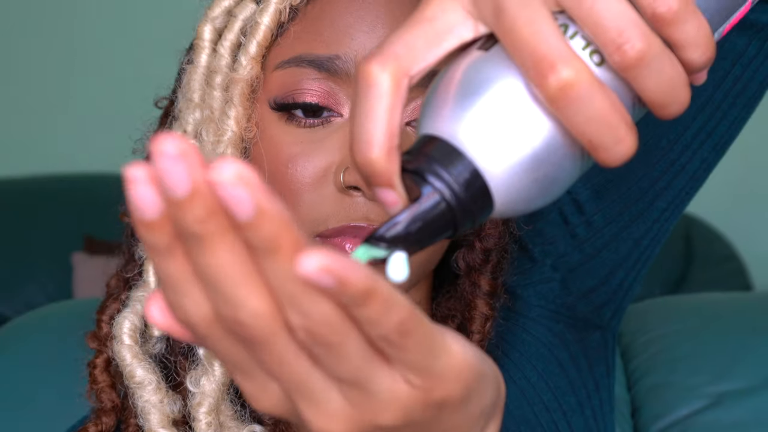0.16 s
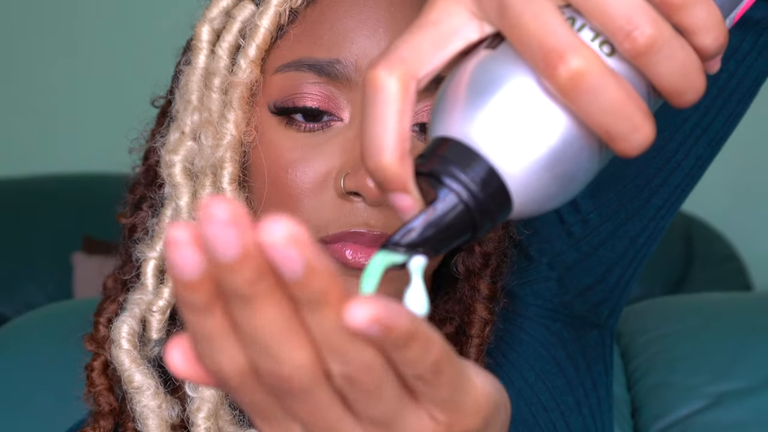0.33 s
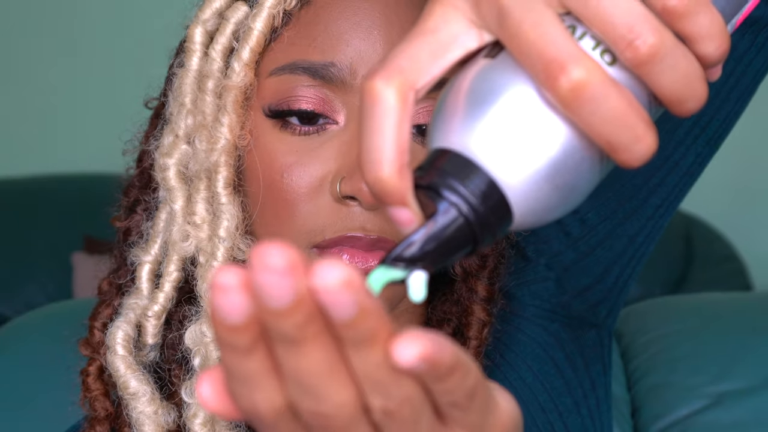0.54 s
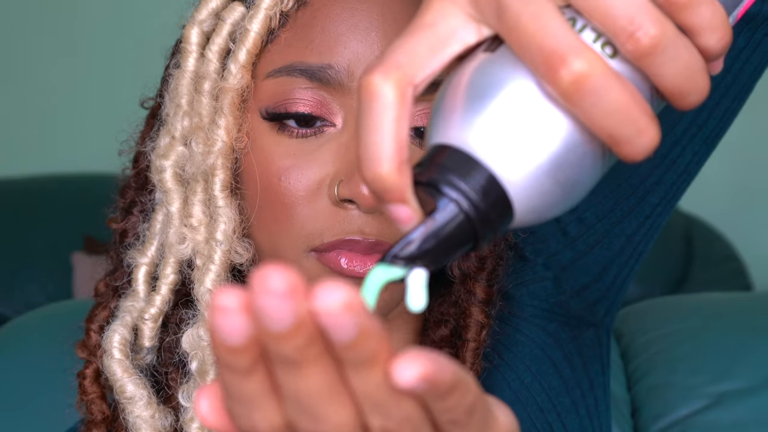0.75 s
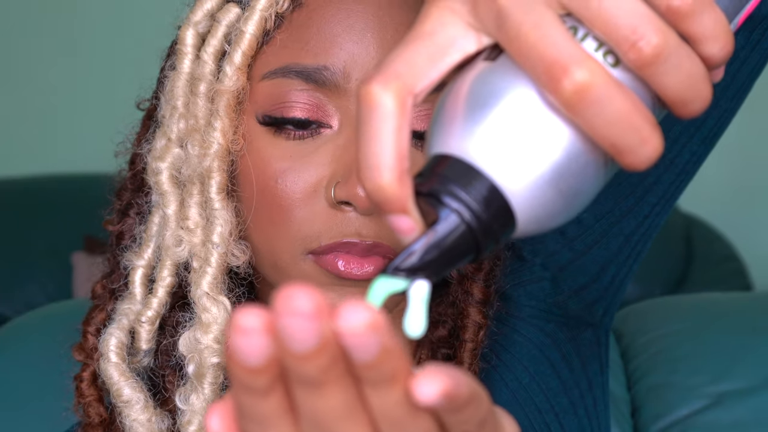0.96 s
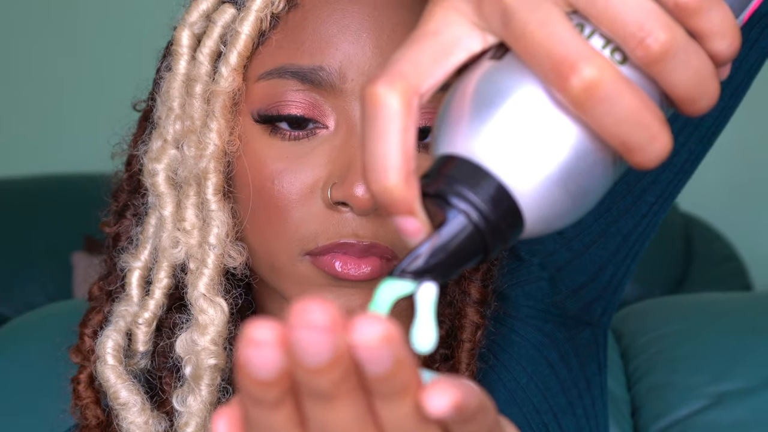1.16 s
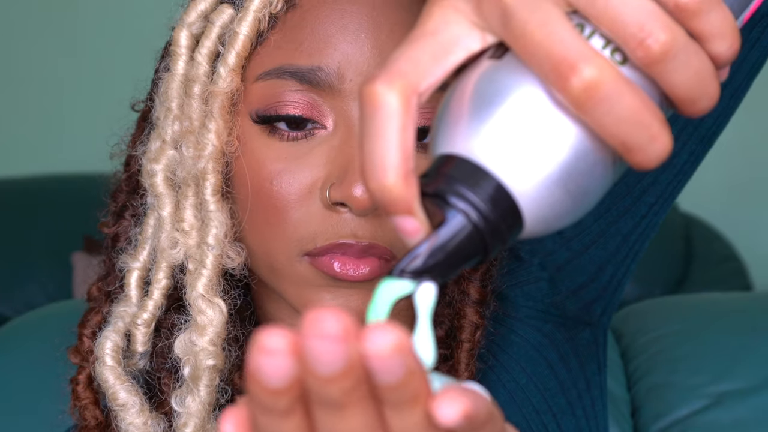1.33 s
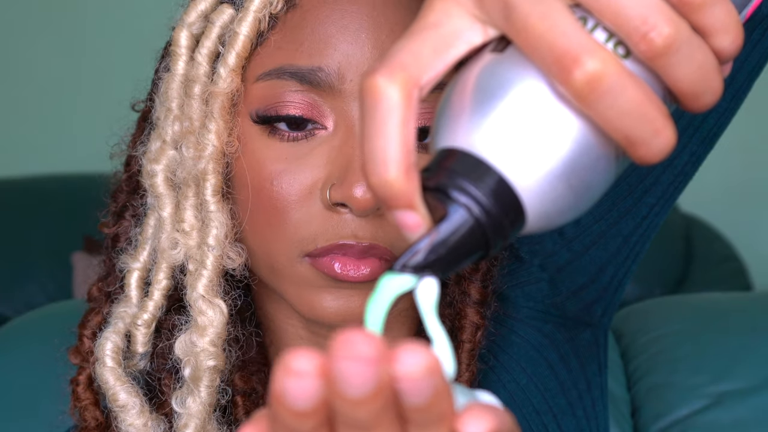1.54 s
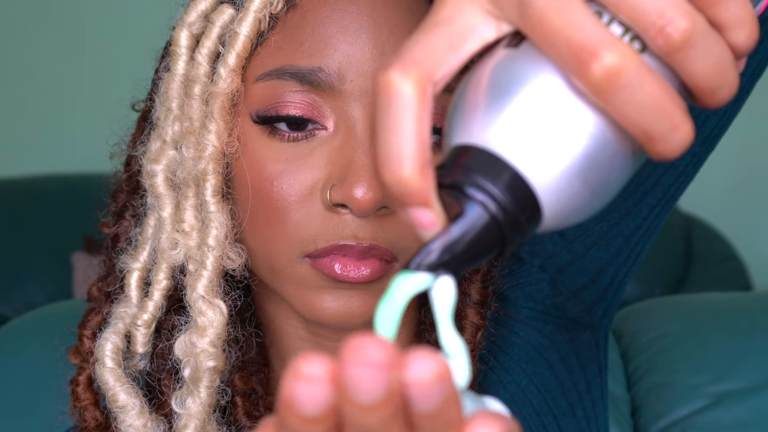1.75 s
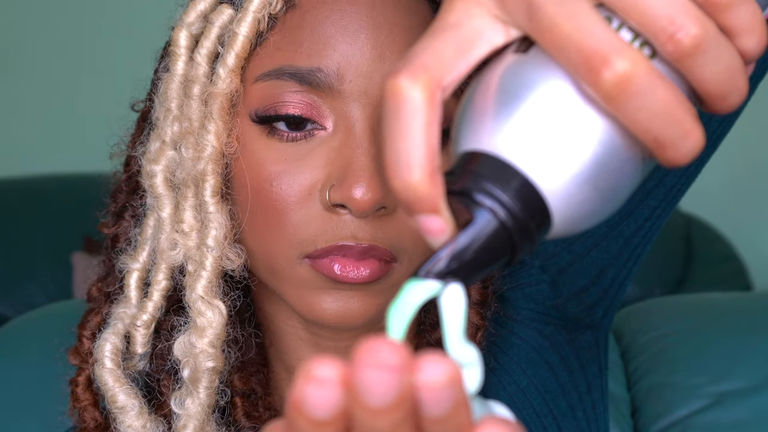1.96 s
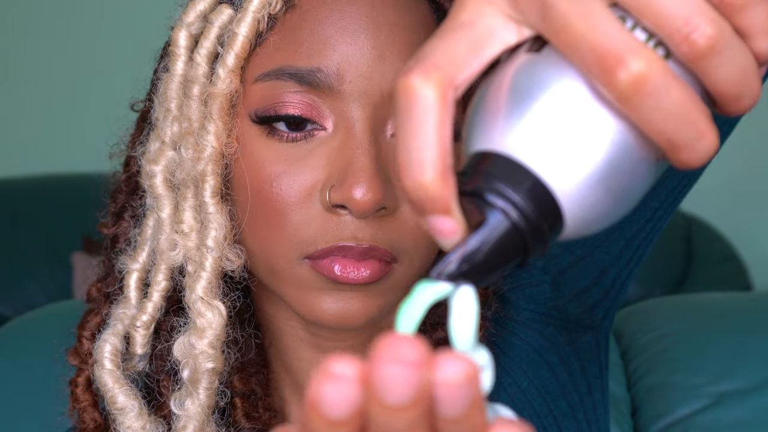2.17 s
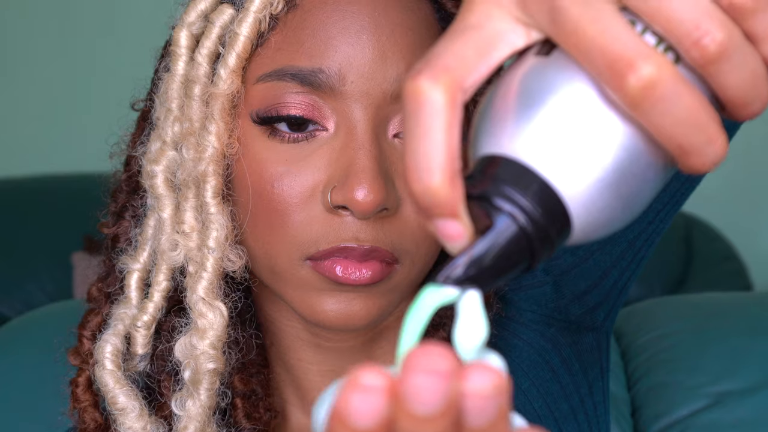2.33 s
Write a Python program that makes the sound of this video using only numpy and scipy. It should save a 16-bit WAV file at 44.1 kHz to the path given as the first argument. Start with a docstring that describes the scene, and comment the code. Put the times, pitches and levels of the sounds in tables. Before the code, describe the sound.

Foam hisses from a mousse can, already running at the start and very close. A nozzle tick lands at 0.1 s; the bright, gassy fizz soon settles, then grows duller and uneven from about 1 s, with tiny whistles near 1.3 and 1.5 s. Around 1.7 s it breaks into wet, crackling sputter, with spits and bubbly pops until 2.5 s. Faint knocks, low rumble, small dry room.

```python
"""In a small furnished room, an upturned can of hair mousse is sprayed into a palm close to the microphone.
Foam fizzes through the nozzle: coloured clicks and noise with narrow, wavering spout resonances.
The flow then breaks into a lower, crackling sputter of noise puffs, ringing bubbles, pops and sharp spits.
Short noise bursts make the nozzle's ticks, a pat of foam and the knocks and thuds of handling.
A low, booming rumble and the steady air of the room are filtered noise."""
import sys
import numpy as np
from scipy import signal
from scipy.fft import rfft, irfft, next_fast_len
from scipy.io import wavfile

SR = 44100
rng = np.random.default_rng(int(sys.argv[2]) if len(sys.argv) > 2 else 0)


def digitize_waveform(pressure):
    """Quantize a signal to 16-bit integers and store it at the path in sys.argv[1].

    Rows of a 2-D input are taken as channels; values are limited to [-1, 1].
    """
    field = np.atleast_2d(pressure).T
    bounded = np.clip(field, -1, 1)
    quanta = np.round(bounded * 32767).astype(np.int16)
    wavfile.write(sys.argv[1], SR, quanta)


N = 110205
TIME_S = np.arange(N) / SR


def undb(db):
    """Logarithmic level: decibels become an amplitude gain."""
    return np.exp(np.asarray(db) * (np.log(10) / 20))


def unit(x):
    """Normalisation: the signal is scaled to rms 1."""
    return x / np.sqrt(np.mean(x ** 2) + 1e-18)


def curve(rows):
    """Envelope: gain over time from rows of (time [s], level [dB]), straight in dB."""
    return undb(np.interp(TIME_S, *np.array(rows).T))


def ramp(start_s, end_s):
    """Crossfade weight: a straight rise from 0 to 1."""
    return np.clip((TIME_S - start_s) / (end_s - start_s), 0, 1)


def colour(x, points):
    """Minimum-phase filtering: a causal response through points of (frequency [Hz], gain [dB])."""
    size = 8192
    hz, db = np.array(points, float).T
    f = np.maximum(np.fft.rfftfreq(size, 1 / SR), 1)
    log_gain = np.log(undb(np.interp(np.log(f), np.log(hz), db)))
    # folding the cepstrum onto positive times makes the response causal
    cepstrum = irfft(log_gain)
    cepstrum[1:size // 2] *= 2
    cepstrum[size // 2 + 1:] = 0
    response = irfft(np.exp(rfft(cepstrum)))[:size // 2]
    length = x.shape[-1]
    padded = next_fast_len(length + size // 2, True)
    return irfft(rfft(x, padded) * rfft(response, padded), padded)[..., :length]


def walk(rate_hz):
    """Random modulation: band-limited wavering, mostly slower than the rate, with rms 1."""
    size, hop = 4096, 32
    f = np.fft.rfftfreq(size, hop / SR) / rate_hz
    spectrum = rfft(rng.standard_normal(size)) * np.sqrt(f) * np.exp(-f ** 2)
    return np.interp(np.arange(N) / hop, np.arange(size), unit(irfft(spectrum)))


def clicks(per_s, spread_db):
    """Shot noise: impulses at random times, of uneven size and random sign."""
    hit = rng.random(N) < per_s / SR
    size = undb(spread_db * np.minimum(rng.exponential(size=N), 4))
    return unit(hit * size * rng.choice([-1, 1], N))


def ring(x, decay_s):
    """Exponential decay: every impulse leaves a tail."""
    return signal.lfilter([1], [1, -np.exp(-1 / (decay_s * SR))], x)


def resonance(hz, width_hz):
    """Noise-driven resonance: slow random envelopes carry a tone whose pitch may move."""
    decay_s = 1 / (np.pi * width_hz * 1.5)  # two decays in a row narrow the band
    in_phase, quadrature = ring(ring(rng.standard_normal((2, N)), decay_s), decay_s)
    phase = 2 * np.pi * np.cumsum(hz * np.ones(N)) / SR
    return unit(in_phase * np.cos(phase) + quadrature * np.sin(phase))


def flicker(x, rate_hz, depth_db):
    """Independent band modulation: each third of an octave wavers on its own."""
    size = next_fast_len(N, True)
    octave = np.log2(np.maximum(np.fft.rfftfreq(size, 1 / SR), 1))
    centres = np.arange(10.67, 13.9, 1 / 3)  # octaves above 1 Hz
    spectrum = rfft(x, size)
    out = np.zeros(N)
    for one_band in np.eye(len(centres)):
        band = irfft(spectrum * np.interp(octave, centres, one_band), size)[:N]
        out = out + band * undb(depth_db * walk(rate_hz))
    return out


def blows(rows, points, decay_s, crack):
    """Impact: each row gives a click and a decaying puff of noise; its level is the rms over the decay time."""
    out, t = np.zeros(N + SR), np.arange(SR // 5) / SR
    for s, db in rows:
        x = rng.standard_normal(len(t)) * np.exp(-t / decay_s)
        x[0] += crack
        x = colour(x, points)
        start = int(s * SR)
        out[start:start + len(t)] += x * undb(db) * np.sqrt(decay_s * SR) / np.linalg.norm(x)
    return out[:N]


def place(x, pan):
    """Interchannel level difference: left minus right from points of (frequency [Hz], difference [dB])."""
    left, right = x * np.ones((2, 1))
    return np.array([colour(left, [(hz, db / 2) for hz, db in pan]),
                     colour(right, [(hz, -db / 2) for hz, db in pan])])


# spectrum of the air: (frequency [Hz], relative level per Hz [dB])
AIR_COLOUR = [(20, -44), (100, -17), (300, -3), (550, -2.5), (900, -16.5), (4000, -28)]
# stereo width of the air: (frequency [Hz], side against mid [dB])
AIR_SIDE = [(60, -11), (150, -10), (400, -4)]


def air():
    """Mid-side stereo: steady noise whose two channels are partly related."""
    mid, side = rng.standard_normal((2, N))
    side = colour(side, AIR_SIDE)
    return unit(colour(np.array([mid + side, mid - side]), AIR_COLOUR)) * undb(-60.5)


# spectrum of the rumble: (frequency [Hz], relative level per Hz [dB])
RUMBLE_COLOUR = [(20, -36), (45, -15), (70, -11), (110, -6), (150, 4.5), (180, -3), (215, 0.5), (300, -1.5),
                 (400, -9), (560, -14), (800, -29), (1200, -35.5), (2500, -44.5)]
# rumble before its wavering: (time [s], level [dB])
RUMBLE_LEVEL = [(0.0, -48), (0.05, -43.5), (.22, -46), (.27, -43.5), (.32, -47.5), (.38, -47), (0.5, -47.5),
                (0.53, -42.5), (.61, -46), (0.7, -53), (0.82, -43.5), (.91, -47), (.96, -51.5),
                (1.07, -54.5), (1.12, -47.5), (1.23, -45.5), (1.32, -50), (1.51, -48), (1.77, -54),
                (2.0, -47.5), (2.04, -56), (2.08, -48), (2.25, -46), (2.39, -56.5), (2.43, -46.5),
                (2.5, -58.5)]
# low boom: (time [s], level [dB])
BOOM_LEVEL = [(0, -64), (.14, -50.5), (.36, -57), (.46, -43.5), (.56, -61), (.93, -57.5), (1.12, -48),
              (1.34, -61.5), (1.44, -41), (1.56, -57), (1.64, -46), (1.76, -54), (2.04, -54), (2.19, -40.5),
              (2.31, -51.5), (2.5, -50.5)]
# soft low thuds of handling: (time [s], level [dB])
THUDS = [(.125, -45.5), (1.21, -47.5), (1.92, -45)]
# spectrum of a thud: (frequency [Hz], gain [dB])
THUD_COLOUR = [(15, -49), (30, -16), (50, 2), (68, -10), (120, -10), (400, -55.5)]
# small dull knocks of the fingers on the can: (time [s], level [dB])
KNOCKS = [(.312, -37), (.531, -38), (.575, -39.5), (.81, -47), (1.497, -42), (1.555, -41.5), (2.09, -46)]
# spectrum of a knock: (frequency [Hz], gain [dB])
KNOCK_COLOUR = [(60, -26), (150, -6), (280, 2.5), (420, -6.5), (700, -21), (2000, -49)]


def rumble():
    """Low-frequency noise and resonance: a restless rumble booms at one pitch under handling impacts."""
    low = unit(colour(rng.standard_normal(N), RUMBLE_COLOUR)) * curve(RUMBLE_LEVEL)
    low = low * undb(1.5 * walk(29))
    boom = resonance(hz=86.8, width_hz=16.7) * curve(BOOM_LEVEL)
    thuds = blows(THUDS, THUD_COLOUR, decay_s=0.027, crack=15)
    knocks = blows(KNOCKS, KNOCK_COLOUR, decay_s=0.0058, crack=28)
    return place(low + boom + thuds + knocks, [(50, -4.0), (90, -0.5), (250, -2.0)])


# fizz unrelated left and right: (frequency [Hz], gain [dB])
DIFFUSE = [(500, -12), (2000, -14.5), (4000, -10), (8000, -7), (13000, -0.5)]


def diffuse(noise):
    """Diffuse sound: independent noise in the two channels is set below the main sound."""
    return colour(noise, DIFFUSE)


SPOUT_DRIFT = 0.01228  # rms pitch drift, as a fraction of the pitch
# spout resonances: (frequency [Hz], width [Hz], level against the jet [dB], rise once foam covers the tip [dB])
SPOUT = [(2098, 124, -22, -7), (3070, 100, -25, -0.5), (4228, 350, -14, 3.5), (6580, 190, -16, 7.5),
         (8080, 350, -16, 7.5), (11050, 150, -14.5, 3), (13260, 250, -18.5, 2)]


def spout_resonances(covered):
    """Cavity resonance: the flow rings narrow bands that drift in pitch and waver in level."""
    out = np.zeros(N)
    for hz, width_hz, db, rise_db in SPOUT:
        gain = undb(db + rise_db * covered + 3 * walk(9))
        out += gain * resonance(hz * (1 + SPOUT_DRIFT * walk(12.36)), width_hz)
    return out


FIZZ_PER_S, FIZZ_SPREAD_DB = 6500, 3.5
GAS_SHARE = 0.69  # rms of the gas noise against the bubble clicks
# jet: (time [s], level [dB])
JET_LEVEL = [(0, -33.5), (.1, -33.5), (.4, -33.5), (.9, -33.5), (1.2, -34), (1.38, -35.2), (1.5, -35),
             (1.62, -38), (1.68, -38), (1.72, -49), (1.9, -56), (2.5, -59)]
# spectrum of the jet: (frequency [Hz], relative level per Hz [dB])
JET_COLOUR = [(410, -47), (700, -19.5), (798, -20.5), (1080, -25.5), (1190, -24), (1330, -13.5),
              (1490, -20), (2040, -7.5), (2670, -18), (3060, -4.5), (3350, -5), (3620, 0), (3910, -1),
              (4230, 2.5), (4760, -2.5), (5490, -6), (6020, -7.5), (6860, -1.5), (8670, -0.5), (9880, -11),
              (10800, -0.5), (11300, -2.5), (12800, -11), (14600, -12.5), (15800, -18.5)]
# extra brightness of the first gassy foam: (frequency [Hz], gain [dB])
FRESH_TILT = [(700, 2), (1500, 3.5), (2100, 5), (2700, 9), (3300, 0), (4300, -1), (8000, .5), (15000, -.5)]
# dulling by the foam that gathers at the tip: (frequency [Hz], gain [dB])
COVERED_TILT = [(700, -3), (1400, -1.5), (2100, -3), (2600, -6.5), (3000, -1), (3400, -3), (4500, 2),
                (5900, -3), (9000, -.5), (11000, -3), (12500, -7), (15000, -6)]
# stereo position of the jet: (frequency [Hz], left minus right [dB])
JET_PAN = [(60, 8), (110, 10), (200, -2.0), (380, 13), (700, -4), (1290, -0.5), (2380, -4), (4400, -1),
           (8120, -1.5), (15000, -6.5)]


def jet():
    """Shot noise plus turbulence: bubbles and gas fizz, growing duller and less even as foam gathers."""
    fresh, covered = 1 - ramp(0.12, 0.48), ramp(1.05, 1.48)
    uneven = ramp(0.71, 1.56)
    fizz = clicks(FIZZ_PER_S, FIZZ_SPREAD_DB) + GAS_SHARE * rng.standard_normal(N)
    x = unit(colour(fizz, JET_COLOUR)) + spout_resonances(covered)
    x = flicker(x, rate_hz=49, depth_db=0.8 + 1.03 * uneven)
    x = x * undb((0.27 + 0.36 * uneven) * walk(120))
    x = x + diffuse(unit(colour(rng.standard_normal((2, N)), JET_COLOUR)))
    x = (fresh * colour(x, FRESH_TILT) + (1 - fresh - covered) * x
         + covered * colour(x, COVERED_TILT))
    return place(unit(x) * curve(JET_LEVEL) + flutters(), JET_PAN)


# ticks of the plastic nozzle: (time [s], level [dB])
TICKS = [(.092, -27.5), (.1095, -38.5), (.747, -42), (.818, -45), (1.032, -50), (1.491, -46.5),
         (1.837, -32), (2.0, -35), (2.312, -40)]
# spectrum of a tick: (frequency [Hz], gain [dB])
TICK_COLOUR = [(200, -4), (550, -10), (760, -1.5), (980, -11), (1330, 3.5), (1650, -3), (2000, 1),
               (2450, 0.5), (2800, -15), (3200, -10), (6500, -13), (12000, -32)]


def nozzle():
    """Impact and decay: plastic ticks under the finger, then the cap rings on briefly and weakly."""
    tick = blows(TICKS, TICK_COLOUR, decay_s=0.0027, crack=8.1)
    tail = undb(-15.5) * blows(TICKS, TICK_COLOUR, decay_s=0.037, crack=0)
    return place(tick + tail, [(500, 2), (1300, -9.0), (4000, 1)])


# soft pat of foam on the palm: (time [s], level [dB])
PATS = [(1.022, -53.5)]
# spectrum of the pat: (frequency [Hz], gain [dB])
PAT_COLOUR = [(200, -12), (600, -5), (900, 0), (1300, -4), (2100, -5), (3000, -18), (8000, -35)]


def pat():
    """Soft impact: a long decay with a weak click makes a dull pat."""
    return blows(PATS, PAT_COLOUR, decay_s=0.065, crack=3)


# whistling flutters: (centre time [s], length between 1/e points [s], level [dB], frequency [Hz])
FLUTTERS = [(1.278, 0.012, -46, 3030), (1.316, 0.017, -42.5, 3030), (1.492, 0.03, -39.5, 3067),
            (1.494, 0.033, -47, 2054)]


def flutters():
    """Transient resonance: the spout whistles briefly under bell-shaped envelopes."""
    out = np.zeros(N)
    for s, length_s, db, hz in FLUTTERS:
        swell = np.exp(-(2 * (TIME_S - s) / length_s) ** 2)
        out += undb(db) * swell * resonance(hz, width_hz=96)
    return out


# resonances of the wet spout: (frequency [Hz], width [Hz], level against the sputter [dB])
WET_SPOUT = [(2075, 116, -13), (3100, 100, -9)]


def wet_spout():
    """Cavity resonance: the wet spout rings with unsteady pitch and level."""
    out = np.zeros(N)
    for hz, width_hz, db in WET_SPOUT:
        out += undb(db + 3.3 * walk(29)) * resonance(hz * (1 + SPOUT_DRIFT * walk(14.04)), width_hz)
    return out


BURSTS_PER_S, BURST_SPREAD_DB, BURST_DECAY_S = 2200, 1.5, 0.0029
SPUTTER_GAS = 0.82  # rms of the noise puffs against the clicks
# sputter before the chokes: (time [s], level [dB])
SPUTTER_LEVEL = [(0, -89), (1.66, -49), (1.725, -31.5), (1.79, -31.5), (1.86, -30), (1.9, -35),
                 (1.94, -32.5), (2.005, -29), (2.035, -33.5), (2.11, -32), (2.18, -34), (2.21, -36.5),
                 (2.275, -35), (2.32, -31), (2.372, -36), (2.44, -33.5), (2.5, -38.5)]
# spectrum of the first, wet sputter: (frequency [Hz], gain [dB])
WET_COLOUR = [(290, -50), (500, -40), (561, -20.5), (621, -35), (728, -19.5), (1260, -17), (1630, -17.5),
              (2060, -4.5), (2210, -8), (2750, -6.5), (3120, -1.5), (4000, -8), (4430, -4), (5830, -12),
              (6930, -13.5), (8130, -19.5), (9390, -49), (13700, -25.5), (15800, -41)]
# spectrum once foam piles up, stronger near 3.5 kHz and hollow near 6 kHz: (frequency [Hz], gain [dB])
HOLLOW_COLOUR = [(290, -56), (500, -40), (649, -35), (707, -23.5), (1210, -18.5), (1350, -14.5),
                 (1480, -19), (2060, -4), (2750, -10), (3520, 3), (4970, -9), (5450, -15), (5950, -24.5),
                 (7200, -13), (7900, -12), (8600, -36), (15800, -30)]
# stereo position of the sputter: (frequency [Hz], left minus right [dB])
SPUTTER_PAN = [(60, 4), (110, 0), (200, 4), (380, 3), (700, -2), (1290, -2.5), (2380, -3), (4400, 0),
               (8120, -2), (15000, -4.5)]


def sputter():
    """Burst excitation: gas puffs ring the spout; as it fills, ringing bubbles join the puffs."""
    bursts = clicks(BURSTS_PER_S, BURST_SPREAD_DB)
    puffs = unit(ring(np.abs(bursts), BURST_DECAY_S) * rng.standard_normal(N))
    x = flicker(bursts + SPUTTER_GAS * puffs, rate_hz=72, depth_db=2.5)
    x = x + diffuse(rng.standard_normal((2, N)))
    wet = unit(unit(colour(x, WET_COLOUR)) + wet_spout())
    bubbly = unit(colour(x, HOLLOW_COLOUR)) + undb(-5.5) * bubbles()
    hollow = ramp(2.03, 2.3)
    choke = undb(-2 * np.maximum(walk(63), 0))  # foam briefly plugs the outlet
    x = ((1 - hollow) * wet + hollow * bubbly) * curve(SPUTTER_LEVEL) * choke
    return place(x + spits() + pops(), SPUTTER_PAN)


# sharp spits of foam: (time [s], level [dB])
SPITS = [(1.754, -38), (1.7605, -26), (1.812, -35), (1.84, -48), (1.903, -42), (2.003, -28.5), (2.007, -35),
         (2.0835, -31.5), (2.3134, -40)]
# spectrum of a spit: (frequency [Hz], gain [dB])
SPIT_COLOUR = [(500, -32), (2000, -2), (7000, 5.5), (9500, -21), (12000, -3), (14500, -3), (16000, -10)]


def spits():
    """Impulsive ejection: very short, bright bursts with a strong click."""
    return blows(SPITS, SPIT_COLOUR, decay_s=.002, crack=11)


POP_RISE_S = 0.00051
SPOUT_HZ, SPOUT_RISE_S, SPOUT_DB = 2050, 0.00087, -12.5  # the spout's answer to each pop
# gas pockets popping in the nozzle: (time [s], peak level before a 1 dB cut [dB], frequency [Hz])
POPS = [(1.7873, -23, 3600), (1.7905, -25, 3320), (1.84, -19, 3370), (1.8662, -18.5, 3330),
        (1.8783, -21, 3450), (1.8873, -22, 3470), (1.9182, -24, 3460), (1.9358, -24, 3310),
        (1.958, -25, 3560), (1.9714, -25, 3540), (1.977, -22, 3300), (1.985, -23, 3240),
        (1.9913, -24, 3500), (2.0307, -24, 3380), (2.0462, -25, 3340), (2.0488, -17, 3700),
        (2.0618, -21, 3430), (2.085, -34, 3720), (2.1545, -19, 3400), (2.1593, -26, 3430),
        (2.1731, -17.5, 3330), (2.177, -27, 3350), (2.222, -26, 3740), (2.248, -26, 3660),
        (2.2605, -24, 3660), (2.2872, -26, 3280), (2.2982, -23, 3650), (2.3267, -18, 3900),
        (2.3475, -23, 4300), (2.3662, -22, 4330), (2.3835, -29, 3530), (2.3893, -27, 3640),
        (2.3972, -20.5, 3840), (2.4052, -20, 3280), (2.4317, -22, 3620), (2.4451, -18.5, 3430),
        (2.455, -27, 3430), (2.4597, -28, 3470), (2.4727, -19.5, 3500)]


def pops():
    """Damped oscillation: each gas pocket rings a few cycles; the spout answers lower and a little longer."""
    out, t = np.zeros(N + SR), np.arange(SR // 80) / SR
    pop_swell = t / POP_RISE_S * np.exp(1 - t / POP_RISE_S)
    spout_swell = t / SPOUT_RISE_S * np.exp(1 - t / SPOUT_RISE_S)
    for s, db, hz in POPS:
        pop_phase, spout_phase = rng.random(2)
        snap = pop_swell * np.sin(2 * np.pi * (hz * t + pop_phase))
        answer = spout_swell * np.sin(2 * np.pi * (SPOUT_HZ * t + spout_phase))
        start = int(s * SR)
        out[start:start + len(t)] += undb(db - 1) * (snap + undb(SPOUT_DB) * answer)
    return out[:N]


BUBBLES_PER_S, BUBBLE_HZ, BUBBLE_OCTAVES = 460, 3600, 0.15  # rate, middle pitch, rms pitch spread
BUBBLE_CYCLES, BUBBLE_SPREAD_DB = 3.9, 3


def bubbles():
    """Bubble resonance: small gas bubbles each ring a few cycles at their own pitch."""
    t = np.arange(SR // 160) / SR
    count = int(BUBBLES_PER_S * N / SR)
    when, up, down, size, phase = rng.random((5, count, 1))
    hz = BUBBLE_HZ * 2 ** (BUBBLE_OCTAVES * np.sqrt(6) * (up - down))
    age = 2 * hz * t / BUBBLE_CYCLES
    gain = undb(-BUBBLE_SPREAD_DB * np.log(size + .03))
    grains = gain * age * np.exp(-age) * np.sin(2 * np.pi * (hz * t + phase))
    index = (when * N).astype(int) + np.arange(len(t))
    return unit(np.bincount(index.ravel(), grains.ravel(), N)[:N])


ROOM_T60_S, ROOM_GAP_S = 0.11, 0.0021
# room sound against direct sound: (frequency [Hz], level [dB])
ROOM_COLOUR = [(60, -16), (130, -20), (250, -10.5), (600, -10.5), (1200, -5.5), (2200, -5), (4000, -8),
               (8000, -5), (13000, -5.5)]


def room(x):
    """Reverberation: short, dense reflections decay exponentially, different on each side."""
    t = np.arange(SR // 4) / SR
    tail = rng.standard_normal((2, len(t))) * undb(-60 * t / ROOM_T60_S) * (t > ROOM_GAP_S)
    tail /= np.linalg.norm(tail, axis=1, keepdims=True)
    return x + colour(signal.fftconvolve(x, tail, axes=1)[:, :N], ROOM_COLOUR)


def scene():
    """Superposition: all sources share the room; its steady air is added outside the reflections."""
    return room(rumble() + jet() + nozzle() + pat() + sputter()) + air()


def record(dry):
    """Band limitation: a steep elliptic low-pass cuts the top."""
    low_pass = signal.ellip(12, .1, 90, 15850, fs=SR, output="sos")  # edge in Hz
    return signal.sosfilt(low_pass, dry)


dry = scene()
out = record(dry)
digitize_waveform(out)
```